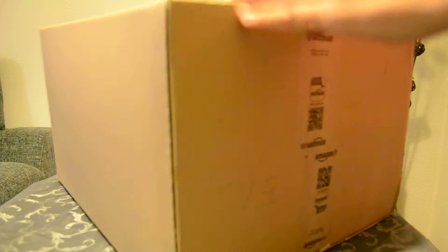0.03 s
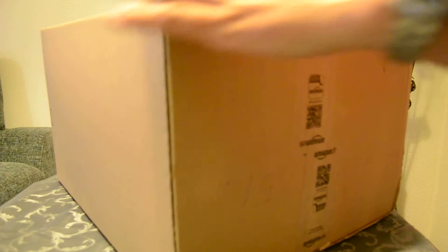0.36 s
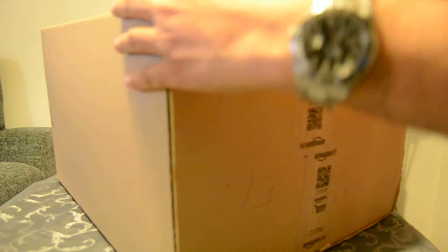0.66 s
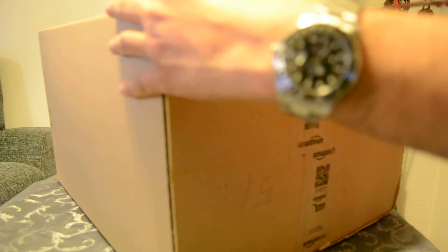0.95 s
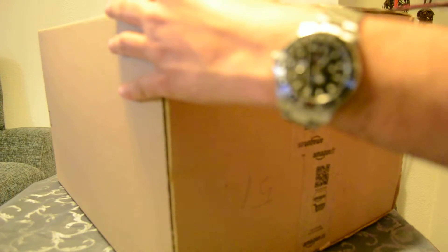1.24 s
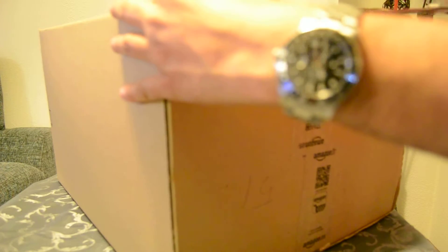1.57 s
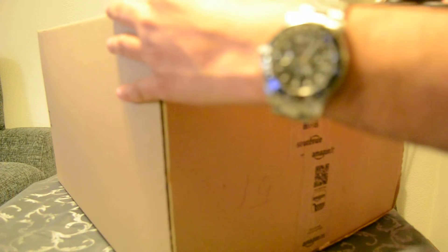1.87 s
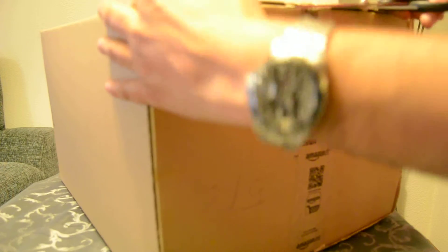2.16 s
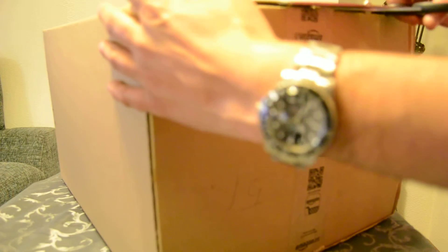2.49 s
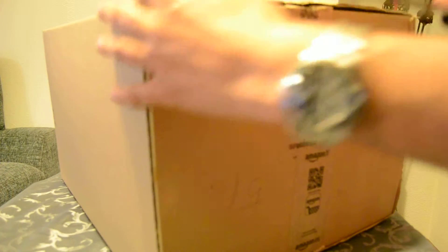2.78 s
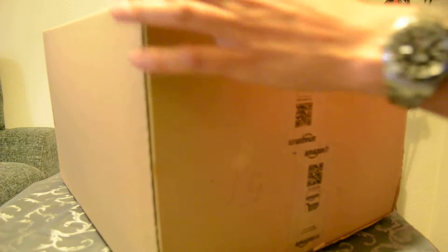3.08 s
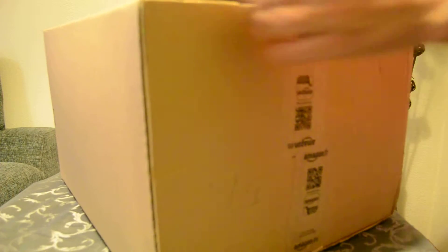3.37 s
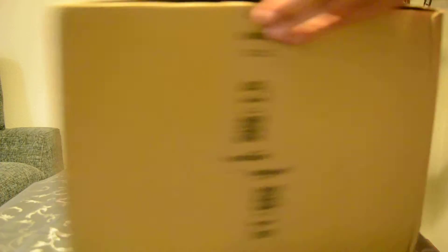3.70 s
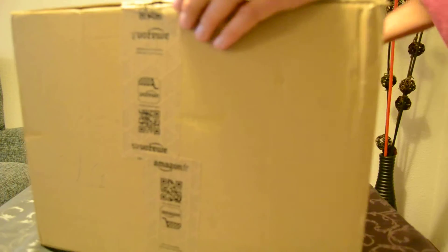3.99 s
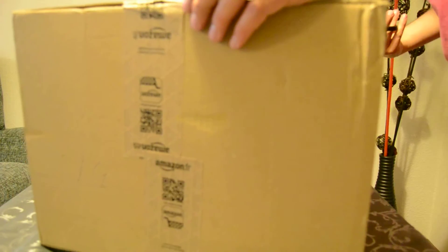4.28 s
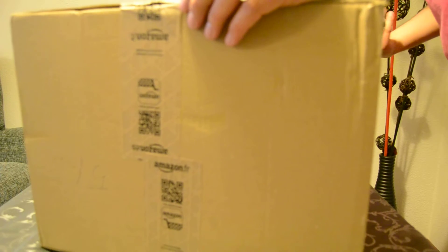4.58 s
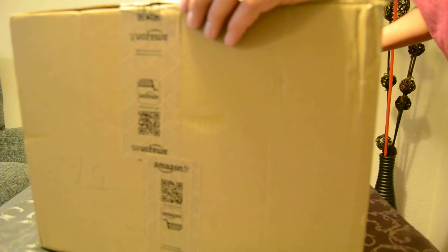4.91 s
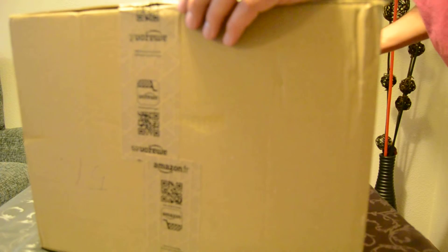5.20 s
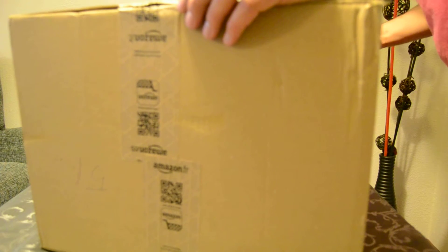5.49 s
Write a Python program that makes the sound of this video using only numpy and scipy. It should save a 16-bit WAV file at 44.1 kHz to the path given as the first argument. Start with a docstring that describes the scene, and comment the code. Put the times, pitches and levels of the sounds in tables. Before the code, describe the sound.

Hands slide over a large cardboard box in soft, uneven strokes that rasp and hiss, with light finger taps on the hollow panels. About halfway through, a flap snaps hard against the box with a brief buzzing rattle. The quiet rubbing and tapping continue as the box is turned, and a lighter knock comes near the end. The microphone is close, in a small, quiet furnished room.

```python
"""Hands rub over a large cardboard box, close to a mono microphone in a small furnished room.
Skin and board catch and slip in strokes that rasp, hiss and drum the walls; fingers tap and brush the
panels. About 2.5 s in, a flap snaps hard against the box and the loose flaps buzz. The box is turned on
its tablecloth and takes a lighter knock near the end. Quiet room tone lies under it all."""
import sys
import numpy as np
from scipy import signal
from scipy.fft import rfft, irfft
from scipy.io import wavfile

SR = 44100
rng = np.random.default_rng(int(sys.argv[2]) if len(sys.argv) > 2 else 0)


def master(y):
    """Save y as 16-bit WAV."""
    cut = np.clip(np.atleast_2d(y).T, -1, 1)
    pcm = np.round(cut * 32767)  # scale
    wavfile.write(sys.argv[1], SR, pcm.astype(np.int16))


N = 249033
TIME = np.arange(N) / SR

# The flap's snap and the lighter knock. Each row: start in seconds, strength in dB, panel pitch in Hz,
# its t60 in seconds, then trims in dB for the crack, the thump, the flaps' rattle and its boxy middle.
BOX_KNOCKS = [(2.5323, -9, 830, 0.016, -7, -10, -13.5, -17.5),
              (5.2491, -19.5, 1266, 0.0086, -17.5, -17.5, -23, -17.5)]


def undb(db):
    """Decibels to gain."""
    return 10 ** (np.asarray(db) / 20)


def unit(x):
    """Scale to rms 1."""
    return x / np.sqrt(np.mean(x ** 2))


def add(track, start_s, sound):
    """Mix a sound into the track at a time."""
    i = max(int(start_s * SR), 0)
    track[i:i + len(sound)] += sound[:N - i]


def through(x, response):
    """Play a signal through an impulse response."""
    return signal.fftconvolve(x, response)[:len(x)]


def on_log_axis(hz, points):
    """Interpolate (Hz, value) points over log frequency."""
    point_hz, value = np.transpose(points)
    return np.interp(np.log(np.maximum(hz, 1)), np.log(point_hz), value)


def colour(x, points, size=4096):
    """Minimum-phase EQ through (Hz, dB) points."""
    gain = undb(on_log_axis(np.fft.rfftfreq(size, 1 / SR), points))
    cepstrum = irfft(np.log(gain))
    cepstrum[1:size // 2] *= 2
    cepstrum[size // 2 + 1:] = 0
    return through(x, irfft(np.exp(rfft(cepstrum))))


def band(x, lo_hz, hi_hz):
    """Band-pass with soft edges."""
    edges = [lo_hz, min(hi_hz, SR / 2 - 1000)]
    return signal.sosfilt(signal.butter(2, edges, "band", fs=SR, output="sos"), x)


def burst():
    """Half a second of white noise."""
    return rng.standard_normal(SR // 2)


def fade(t60):
    """Half a second of decay, falling 60 dB every t60 seconds."""
    return np.exp(-np.log(1000) * TIME[:SR // 2] / t60)


def ring(hz, t60):
    """One struck mode."""
    return np.sin(2 * np.pi * hz * TIME[:SR // 2]) * fade(t60)


def wander(rate_hz):
    """Smooth random motion with a spread near 1."""
    knots = rng.standard_normal(N // 20)
    return np.interp(TIME * rate_hz, np.arange(len(knots)), knots)


def hand_speed(start, rise, fall):
    """A stroke eases up to full speed (1), then friction brakes it evenly to rest."""
    push = np.sin(np.pi / 2 * np.clip((TIME - start) / rise, 0, 1))
    brake = np.clip(1 - (TIME - start - rise) / fall, 0, 1)
    return push * brake


def stroke_gains():
    """Gains of rasp, hiss and drumming: the hiss needs speed, the walls answer even a slow hand."""
    # Strokes over the board. Each row: start, time speeding up and time slowing down in seconds,
    # strength in dB, then trims in dB for the hiss and the drumming.
    strokes = [(0, 0.0017, 0.098, -53, 3, -8), (0, .06, 0.35, -56, -15, -19),
               (.14, 0.098, 0.28, -58, 7, -15), (.5, 0.056, 0.2, -61.5, 7, -8),
               (.6, 0.2, 0.16, -56, -20, -10), (.935, .012, 0.1, -71.5, 3.5, 4),
               (1.08, 0.21, .12, -62.5, 0, -4), (1.236, 0.1, 0.13, -44, -8, -20.5),
               (1.44, .17, 0.74, -47, -2.5, -12.5), (1.9, 0.054, 0.68, -57.5, -19.5, -4),
               (2.262, 0.04, .1, -47.5, -5.5, -1.5), (2.35, 0.086, 0.29, -46.5, -10, -1.5),
               (2.68, 0.14, 0.58, -63.5, 1.5, -9), (2.955, 0.018, 0.42, -58, -6, -5),
               (3.2, .1, 0.2, -59.5, 0.5, -6.5), (3.419, 0.024, 0.38, -54.5, 1, -3),
               (3.54, 0.16, 0.33, -54, 12, -9.5), (3.6, 0.26, 0.47, -54, 1.5, -15),
               (4.05, 0.11, 0.34, -63, -8, -14), (4.43, 0.18, 0.32, -59, -22, -5),
               (4.66, 0.17, 0.18, -48.5, -17.5, -15), (4.86, 0.057, 0.24, -55, -2.5, -4.5),
               (5.14, .06, 0.27, -49, -11, -15), (5.44, 0.05, 0.17, -52, -14, -8)]
    # A hand that only holds the box still creeps: resting strengths of rasp, hiss and drumming in dB.
    hold_db = (-71.5, -85.5, -71.5)
    speed_powers = np.array([[1.18], [1.46], [0.96]])  # rasp, hiss, drumming
    energy = undb(hold_db)[:, None] ** 2
    for start, rise, fall, db, hiss_db, drum_db in strokes:
        peaks = undb([[db], [db + hiss_db], [db + drum_db]])
        energy = energy + (peaks * hand_speed(start, rise, fall) ** speed_powers) ** 2
    return np.sqrt(energy)


def slips(per_second, spread_db):
    """Fibres catch and let go: random clicks, a few much larger than the rest."""
    size = undb(spread_db * np.minimum(rng.exponential(size=N), 5))
    lets_go = rng.random(N) < per_second / SR
    return unit(lets_go * size * rng.standard_normal(N))


def panel(x):
    """The rubbed board lifts the slips at its own broad resonances."""
    # Each row: centre in Hz, width in Hz, gain in dB.
    resonances = [(508, 90, 4), (919, 150, -2.5), (1110, 58, -9.5), (1600, 180, -8.5), (2280, 160, -4),
                  (2690, 200, 0.5)]
    return x + sum(undb(db) * signal.lfilter(*signal.iirpeak(hz, hz / width, fs=SR), x)
                   for hz, width, db in resonances)


def box_ring():
    """The walls and the air between them, answering one push."""
    # Each row: pitch in Hz, relative level in dB, t60 in seconds.
    box_modes = [(144.9, -0.5, 0.27), (230, -4.5, 0.27), (310, -8.5, 0.047), (430, -6, 0.091),
                 (505, -11, 0.16), (555.4, 8, 0.18), (689, 1.5, 0.14), (904, -6.5, 0.073),
                 (1057, -9.5, .25), (1068, 2.5, 0.39), (1323, 3.5, 0.236), (1550, -10, 0.078),
                 (2130, -6, .2), (2310, -3, 0.32), (2484, 3.5, .2)]
    return sum(undb(db) * ring(hz, t60) for hz, db, t60 in box_modes)


def rubbing():
    """Slips rasp in the board, drum the walls and hiss at the surface; the hand moves unevenly."""
    # Tone of the board's rasp, the walls' drumming, the surface scuff and the fibres' hiss.
    # Each row: frequency in Hz, relative level in dB.
    rasp_tone = [(250, -33.5), (400, -8), (510, -1.5), (720, 1.5), (1000, 2), (1600, 2), (2600, -10),
                 (3600, -15.5), (6000, -28.5), (11000, -49)]
    drum_tone = [(40, -13), (90, -14.5), (140, -6), (220, 0), (310, 2.5), (420, -6), (600, -21),
                 (1200, -56.5)]
    scuff_tone = [(1000, -28), (2000, 0), (3000, -2.5), (4500, -4.5), (6500, -10), (9000, -14),
                  (12000, -17.5)]
    hiss_tone = [(2000, -15.5), (4000, -6), (6000, -2.5), (9000, -1), (12000, -2.5)]
    rasp_gain, hiss_gain, drum_gain = stroke_gains()
    grip = undb(0.93 * wander(rate_hz=55))
    catches = slips(per_second=5000, spread_db=2.03)
    rasp = rasp_gain * undb(-2.0) * unit(colour(panel(catches), rasp_tone))
    in_walls = unit(catches + undb(-14.5) * unit(through(catches, box_ring())))
    drum = drum_gain * undb(-4.0) * unit(colour(in_walls, drum_tone))
    # the scuff swells about midway between the rasp and the hiss
    scuff_gain = rasp_gain * (hiss_gain / rasp_gain) ** 0.47 * undb(-0.66)
    scuff = scuff_gain * unit(colour(slips(per_second=9000, spread_db=1.1), scuff_tone))
    hiss = hiss_gain * unit(colour(slips(per_second=14000, spread_db=1.4), hiss_tone))
    return grip * (rasp + drum + scuff + hiss)


def room_tone():
    """The quiet, steady murmur of the room."""
    # Each row: frequency in Hz, relative level in dB.
    murmur_tone = [(20, 0), (60, -6), (140, -1), (350, 4.5), (1000, 2.5), (3000, -7.5), (6000, -25.5),
                   (11000, -19)]
    return undb(-63.5) * unit(colour(rng.standard_normal(N), murmur_tone))


def spot(hz, t60, upper_db):
    """A patch of board rings in two close modes; the slow part of the push does not radiate."""
    modes = ring(hz, t60) + undb(upper_db) * ring(hz * 1.466, t60)
    return band(modes, hz / 2, hz * 3)


def taps():
    """A finger lands: a click, the spot's ring and crunch, a soft thud and a little of the whole box."""
    # Each row: start in seconds, strength in dB, spot pitch in Hz, then click and thud trims in dB.
    finger_taps = [(0.1008, -46.5, 3800, -8, -23), (0.4854, -34.5, 1930, -10, -31),
                   (0.494, -45, 2200, -16, -21), (0.511, -41.5, 2300, -4, -23),
                   (0.556, -36.5, 1120, -12, -12.5), (0.828, -38, 1900, -20, -23),
                   (1.215, -50, 7100, 4, -18), (2.273, -38, 750, -15, -8.5), (2.852, -42, 6960, -3, -14),
                   (3.5007, -29.5, 476, -14, -12.5), (3.5, -36.5, 2420, -18, -28),
                   (4.246, -53, 824, -12, 1.5), (4.325, -43, 1053, -10.5, -4),
                   (4.8607, -35, 2210, -4.5, -15), (4.868, -34, 2620, -8.5, -23),
                   (5.161, -44.5, 418, -6, 1), (5.21, -27, 1214, -13.5, -20),
                   (5.279, -27.5, 1100, -13.5, -33)]
    # The thud of the walls. Each row: frequency in Hz, relative level in dB.
    thud_tone = [(50, -14), (105, -4), (150, 1), (200, -2), (290, -5), (420, -3.5), (800, -7.5),
                 (2000, -33.5)]
    out, box = np.zeros(N), box_ring()
    for start, db, hz, click_db, thud_db in finger_taps:
        t60 = 0.018 * (986 / hz) ** 0.3  # stiffer, higher spots ring shorter
        click = band(burst(), 750, 11000) * fade(0.033)
        crunch = unit(band(burst(), hz / 1.45, hz * 1.3)) * fade(2.5 * t60)
        thud = unit(colour(burst(), thud_tone)) * fade(0.097)
        touched = undb(-1.5) * spot(hz, t60, upper_db=-8.5) + undb(-11) * crunch
        tap = touched + undb(click_db) * click + undb(thud_db) * thud + undb(-33) * box
        add(out, start, undb(db) * tap)
    return out


def brushes():
    """A fingertip brushes by: a short swell of slips around one pitch, quicker to start than to stop."""
    # Each row: time of the peak in seconds, rough length in seconds, strength in dB, centre in Hz.
    fingertip_brushes = [(0.291, 0.017, -58, 420), (1.222, 0.016, -57, 8500), (2.15, 0.038, -59, 8000),
                         (2.221, 0.04, -53, 1650), (2.402, 0.0076, -45, 4300), (2.457, 0.0092, -47.5, 6700),
                         (2.508, 0.0089, -44.5, 7400), (2.808, 0.066, -52.5, 10200),
                         (3.019, 0.018, -56, 10100), (3.075, 0.023, -58.5, 8900),
                         (3.192, 0.029, -54.5, 8800), (3.273, 0.014, -48.5, 7050), (3.347, 0.034, -52, 950),
                         (4.865, 0.027, -50, 6450), (4.952, 0.014, -50.5, 3600),
                         (5.043, 0.025, -59.5, 7800), (5.157, 0.019, -56, 3830),
                         (5.245, 0.0037, -43.5, 3940)]
    out, grains = np.zeros(N), slips(per_second=9100, spread_db=1.81)
    for peak_s, length, db, hz in fingertip_brushes:
        width = length * np.where(TIME < peak_s, 0.7, 1.15)
        swell = np.exp(-2 * ((TIME - peak_s) / width) ** 2)
        out += undb(db) * swell * unit(band(grains, hz / 1.63, hz * 1.48))
    return out


def knocks():
    """An edge scrapes loose and strikes: a snap, a crack, the panel's note, a thump, the box's ring."""
    scrape_s, panel_lag_s = 0.0055, 0.0006
    out, box = np.zeros(N), box_ring()
    for start, db, hz, t60, crack_db, thump_db, _, _ in BOX_KNOCKS:
        scrape = band(rng.standard_normal(int(scrape_s * SR)), 790, 9900)
        scrape *= np.linspace(0.15, 1, len(scrape))
        add(out, start - len(scrape) / SR, undb(db - 17) * scrape)
        snap = undb(5) * ring(hz=9000, t60=0.004)
        crack = undb(4.5) * band(burst(), 1500, 12000) * fade(0.018)
        add(out, start, undb(db + crack_db) * (snap + crack))
        # the heavy panel gives way a moment after the snap
        note = spot(hz, t60, upper_db=-5.5)
        thump = undb(thump_db) * spot(hz=442, t60=0.036, upper_db=4.0)
        body = band(thump + undb(-32.5) * box, 170, 3600)
        add(out, start + panel_lag_s, undb(db) * (note + body))
    return out


def rattles():
    """After a knock the loose flaps buzz and the room answers: a dense tail with a boxy middle."""
    # The buzz of the flaps. Each row: frequency in Hz, relative level in dB.
    buzz_tone = [(60, -30.5), (150, -16.5), (250, -11), (420, 6.5), (1100, 3.5), (2200, -1), (4000, 2),
                 (7000, -2.5), (11000, -9.5)]
    out, onset = np.zeros(N), 1 - fade(0.0076)
    for start, db, *_, rattle_db, middle_db in BOX_KNOCKS:
        buzz = unit(colour(burst(), buzz_tone))
        early = buzz * fade(0.26)
        late = undb(-10) * band(buzz, 131, 4500) * fade(0.52)  # the treble is absorbed first
        middle = unit(band(burst(), 1000, 2580)) * fade(0.28)
        tail = undb(rattle_db) * (early + late) + undb(middle_db) * middle
        add(out, start, undb(db) * tail * onset)
    return out


def room(x, wet_db, bounce_db):
    """Direct sound, a bounce off the near wall, then a diffuse tail that dies soonest at the very top."""
    # The small room's decay. Each row: frequency in Hz, t60 in seconds.
    decay_times = [(120, 0.52), (500, 0.46), (2000, 0.36), (5000, 0.62), (10000, 0.2)]
    # Soft furniture swallows the tail's highs. Each row: frequency in Hz, gain in dB.
    furniture_tone = [(300, 0.5), (2000, 2.5), (5000, -4.5), (10000, -2.5)]
    bounce_s = 0.0068
    tail = 0
    for hz in 90 * 2.0 ** np.arange(8):
        octave = band(burst(), hz / np.sqrt(2), hz * np.sqrt(2))
        tail = tail + octave * fade(on_log_axis(hz, decay_times))
    tail *= 1 - fade(0.016)  # the echoes take a moment to build
    tail /= np.sqrt(np.sum(tail ** 2))
    response = undb(wet_db) * colour(tail, furniture_tone)
    response[0] += 1  # direct sound
    response[int(bounce_s * SR)] += undb(bounce_db)
    return through(x, response)


def scene():
    """All the handling, heard from close by in the small room, on one channel."""
    friction = undb(-0.5) * room(rubbing() + brushes(), wet_db=-9, bounce_db=-23)
    tapping = room(taps(), wet_db=-9, bounce_db=-11.5)
    knocking = room(knocks(), wet_db=-10, bounce_db=-16)
    return (friction + tapping + knocking + rattles() + room_tone())[None]


def record(dry):
    """The small microphone dips near 8 kHz, peaks above it, rounds the hardest crack and cuts the top."""
    # Each row: frequency in Hz, gain in dB.
    microphone_response = [(20, -6), (6800, 1.5), (7400, 1), (7900, -3.5), (8500, 3.5), (9300, 4.5),
                           (10100, 0.5), (10900, -9), (11600, -24.5)]
    ceiling, top_hz = 0.8, 11600
    coloured = np.array([colour(channel, microphone_response) for channel in dry])
    rounded = ceiling * np.tanh(coloured / ceiling)
    top_cut = signal.ellip(8, 0.2, 70, top_hz, fs=SR, output="sos")
    return signal.sosfilt(top_cut, rounded)


dry = scene()
out = record(dry)
master(out)
```